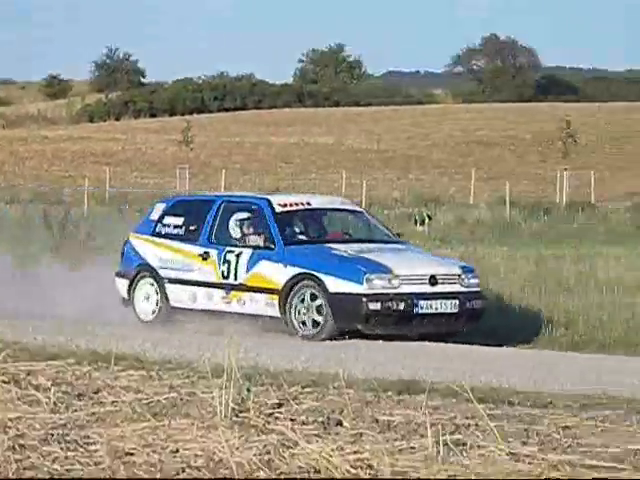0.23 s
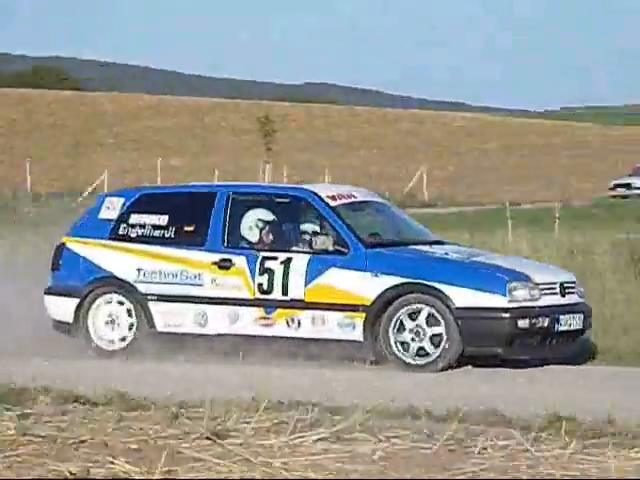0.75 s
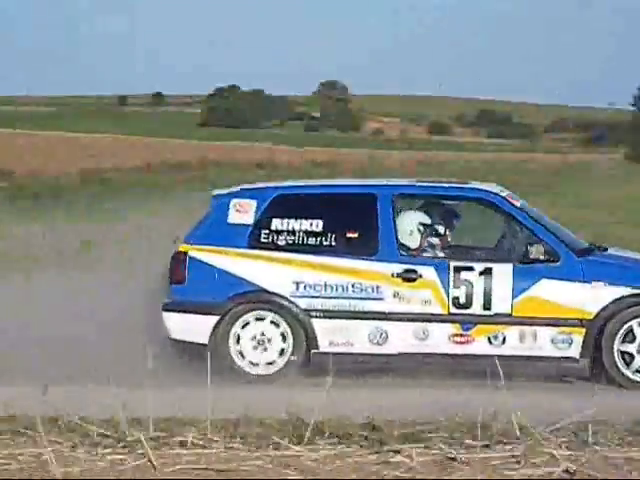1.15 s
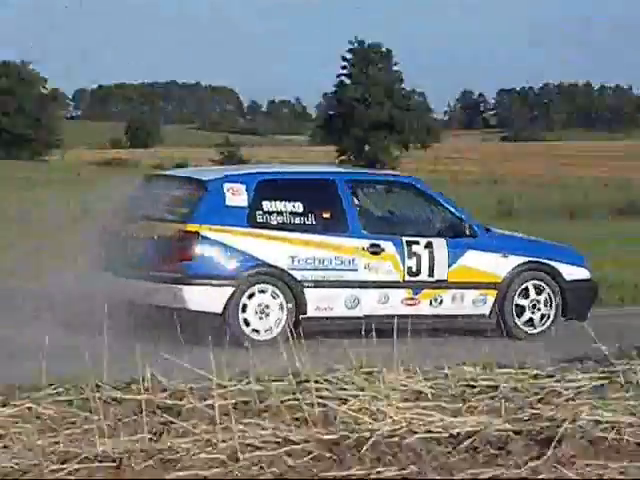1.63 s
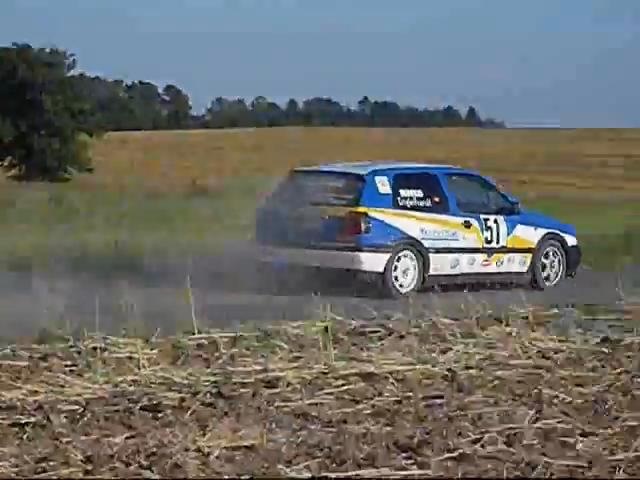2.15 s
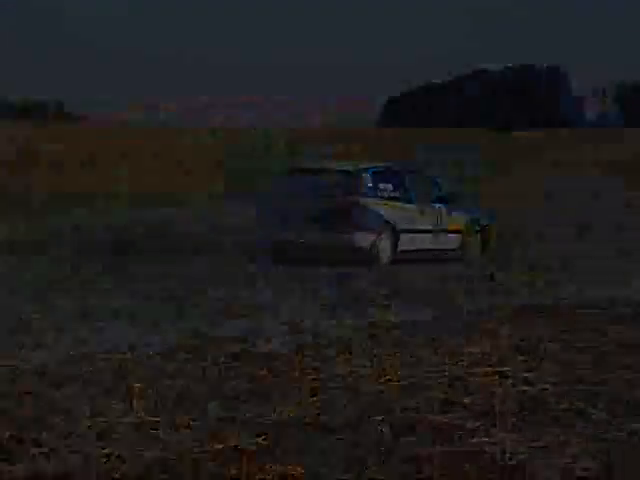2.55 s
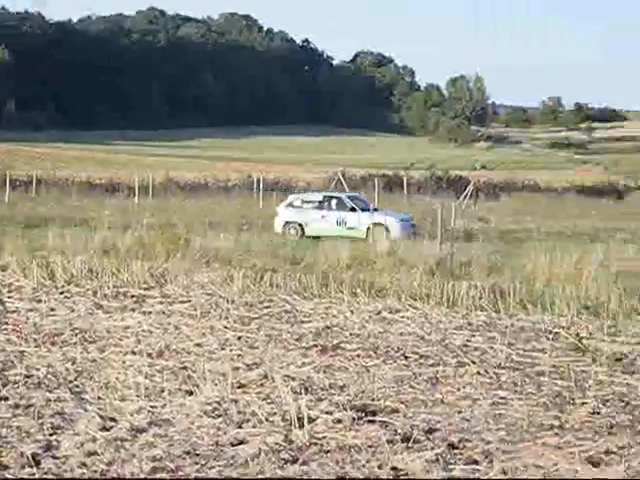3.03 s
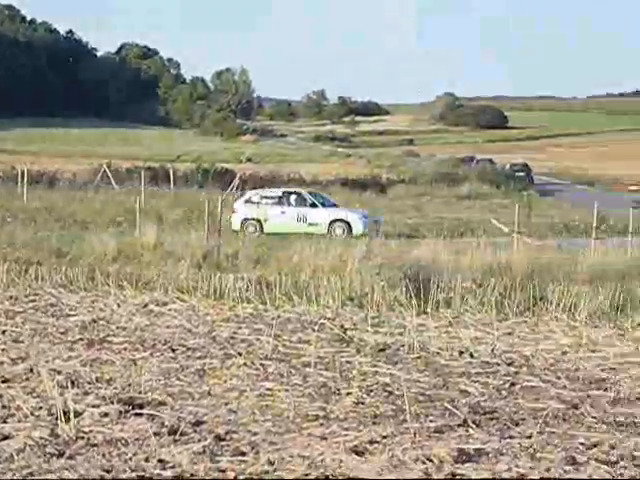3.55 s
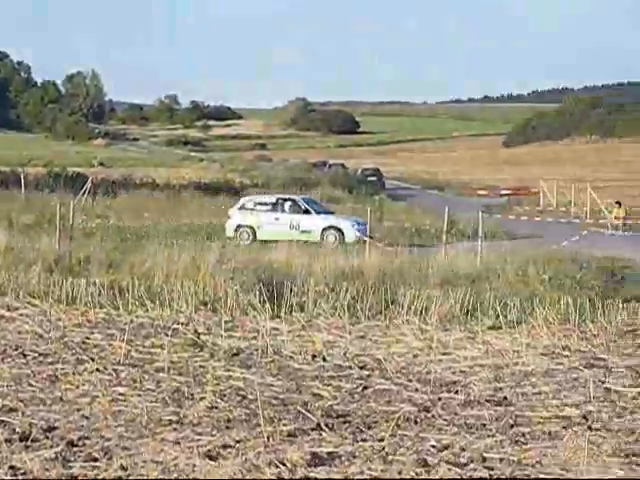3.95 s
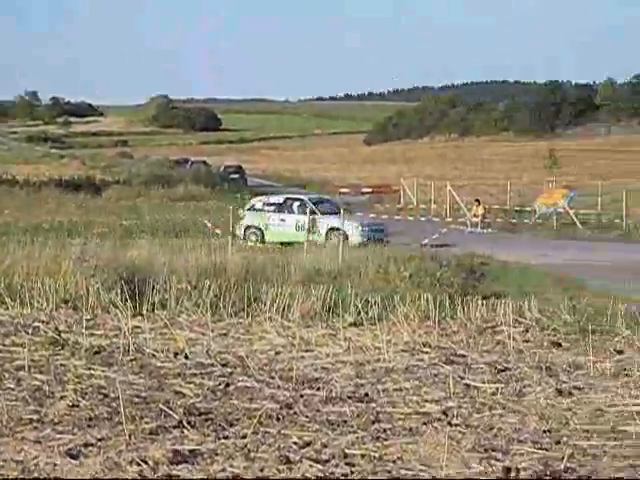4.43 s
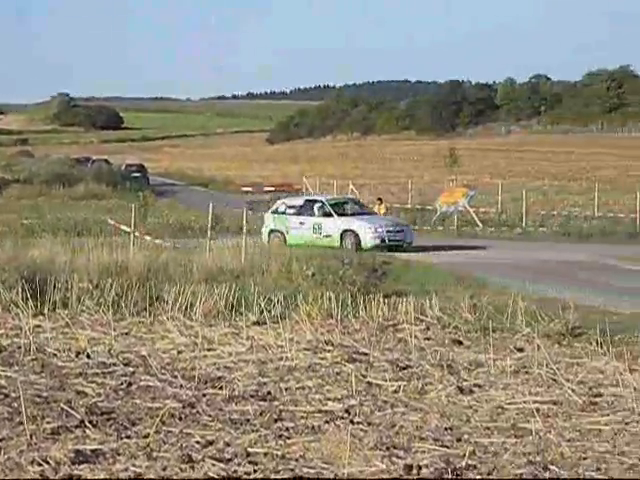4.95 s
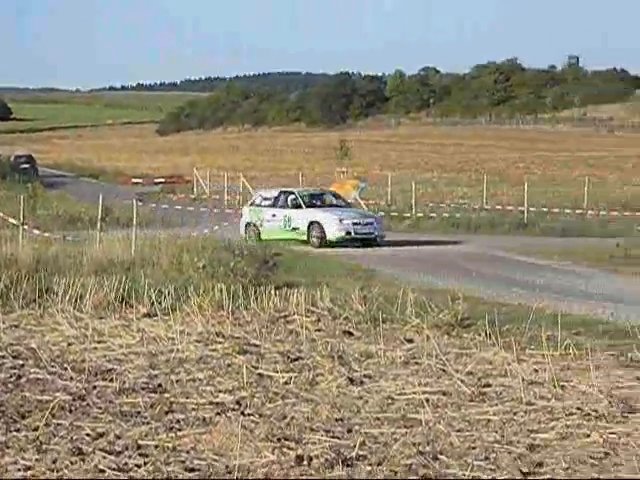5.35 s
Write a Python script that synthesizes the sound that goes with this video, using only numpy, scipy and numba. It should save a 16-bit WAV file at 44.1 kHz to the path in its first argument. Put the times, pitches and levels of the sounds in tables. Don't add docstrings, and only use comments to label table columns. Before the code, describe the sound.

Close pass first: full-throttle four-cylinder growl, heavy gravel spray, pebbles clicking and pinging against metal, brief gear whine, exhaust louder as it leaves. A hard edit drops to a far car across open fields, a faint hum over dull road roar that revs up and then brakes. Nearby fingers scrape and tick on the plastic camera, a tiny focus motor hisses, and two hard knocks jump out. The mono sound is coarse, hissy and low fidelity.

```python
import sys
import numpy as np
from scipy import signal
from scipy.fft import rfft, irfft, next_fast_len
from scipy.io import wavfile
from scipy.ndimage import uniform_filter1d
from numba import njit

SR = 44100
rng = np.random.default_rng(int(sys.argv[2]) if len(sys.argv) > 2 else 0)


def wav_out(sig):
    wavfile.write(sys.argv[1], SR, np.round(np.clip(np.atleast_2d(sig).T, -1, 1) * 32767).astype(np.int16))


def boost(x):
    u = np.asarray(x, float) / 20
    return 10 ** u


N = 246959

CUT_S = 2.879


def walk(rate):
    hold = int(SR / rate)
    levels = np.repeat(rng.standard_normal(N // hold + 1), hold)
    return 1.3 * uniform_filter1d(uniform_filter1d(levels, hold), hold)[:N]


def columns(rows):
    s, *cols = np.transpose(rows)
    return [np.interp(np.arange(N) / SR, s, col) for col in cols]


def surges(rows):
    t = np.arange(N) / SR
    return sum(db * np.exp(-((t - s) / width) ** 2) for s, db, width in rows)


def ease(at_s, db):
    return db * (1 + np.tanh((np.arange(N) / SR - at_s) / .06)) / 2


def colour(x, table):
    hz, db = np.transpose(table)
    size = next_fast_len(N)
    f = np.fft.rfftfreq(size, 1 / SR) + 1
    gain = boost(np.interp(np.log(f), np.log(hz), db, left=-60, right=-60))
    y = irfft(rfft(x, size) * gain, size)[:N]
    return y / np.sqrt(np.mean(y ** 2))


def grit(per_s, spread_db, share):
    share = np.clip(share, 0, 1)
    sizes = boost(spread_db * np.minimum(rng.exponential(size=N), 3))
    clicks = (rng.random(N) < per_s / SR) * sizes * rng.choice([-1, 1], N)
    return np.sqrt(1 - share) * rng.standard_normal(N) + np.sqrt(share) * clicks / np.std(clicks)


@njit
def rings(start, hz, t60, size):
    out = np.zeros(N)
    for k in range(len(start)):
        turn = np.exp(2j * np.pi * hz[k] / SR - np.log(1000) / (t60[k] * SR))
        z = size[k] + 0j
        for i in range(int(start[k] * SR), min(N, int((start[k] + t60[k]) * SR))):
            z *= turn
            out[i] += z.imag
    return out


def bursts(s, db, t60):
    # frequency in Hz, level in dB per Hz
    crack_tone = [(900, -30), (1500, -7), (2200, -1), (3000, 0.5), (3500, -1.5), (3900, -7.5), (4300, -18)]
    kicks = np.zeros(N)
    kicks[(s * SR).astype(int)] = boost(db)
    fades = signal.lfilter([1], [1, -boost(-60 / (t60 * SR))], kicks)
    return fades * colour(rng.standard_normal(N), crack_tone)


def strikes(rows, t60, low_hz, low_t60):
    s, db, hz, low_db = np.transpose(rows)
    one = np.ones(len(s))
    spot = 1.3 ** rng.uniform(-1, 1, len(s))
    crack = bursts(s, db - 11, 2.4 * t60)
    bright = rings(s, hz, t60 * one, boost(db - 3.5))
    dull = rings(s, low_hz * spot, low_t60 * one, boost(db + low_db - 8))
    return crack + bright + dull


def chips(rows, t60_at_1k, gain_db):
    s, hz, db = np.transpose(rows)
    t60 = t60_at_1k * np.minimum(1000 / hz, 1) ** .7
    return rings(s, 1. * hz, t60, boost(db + gain_db - 3 * (hz < 800)))


def order(phase, k, db, flutter_db):
    wobble = .09 * np.sqrt(k + 1) * walk(45)
    return np.sqrt(2) * boost(db + flutter_db * walk(25)) * np.sin(k * phase + wobble - k * k)


def whine(rows):
    hz, db = columns(rows)
    phase = 2 * np.pi * np.cumsum(hz * (1 + .012 * walk(40))) / SR
    return order(phase, 0.98, db, flutter_db=1.5)


def rattle():
    t = np.arange(N) / SR
    cycle = (t - 1.657) / .0284
    limp_db = 2.5 * np.cos(np.pi * np.floor(cycle))
    slap = boost(10.5 + limp_db) * np.exp(-(cycle % 1) / .35)
    return np.where(t < CUT_S, uniform_filter1d(slap, size=120), 1)


def far_car():
    # time in seconds, firing rate in Hz, level of the first order in dB
    far_engine = [
        (2.9, 99, -42.5),
        (3.15, 97, -44),
        (3.36, 109, -44),
        (3.55, 132, -44),
        (3.8, 155, -38.5),
        (4.3, 137.5, -42),
        (4.66, 116.9, -44.5),
        (5.05, 116, -45.5),
        (5.25, 115.8, -62),
    ]
    # multiple of the firing rate, level in dB against the first
    far_orders = [(1, 0.5), (2, -18.5), (3, -22)]
    # frequency in Hz, level in dB per Hz
    roar_tone = [(100, -23), (170, -6), (250, -5.5), (330, -10), (450, -8), (620, -12.5), (850, -14),
                 (1000, -20), (1400, -24), (1900, -44)]
    # time in seconds, surge in dB, width in seconds
    swells = [
        (3.05, 2.1, .06),
        (3.19, -2.5, .04),
        (3.9, 1.5, .08),
        (4.07, 2.5, .1),
        (4.38, 2.1, 0.056),
        (4.68, 2.5, .12),
        (5.12, -2.5, .15),
        (5.4, 2.5, .1),
    ]
    # time in seconds, change in dB, width in seconds
    misfires = [
        (3.515, -14, .018),
        (3.81, -9, .012),
        (4.445, -18, .016),
        (4.6, -7, .015),
    ]
    hz, db = columns(far_engine)
    phase = 2 * np.pi * np.cumsum(hz) / SR
    roar_db = -46 + surges(swells) + 1.5 + 1.1 * walk(30)
    roar = boost(roar_db) * colour(grit(500, 1.7, 0.18), roar_tone)
    db = db + surges(misfires)
    return sum(order(phase, k, db + rel_db, flutter_db=1.8) for k, rel_db in far_orders) + roar


def lens_motor():
    # time in seconds, surge in dB, width in seconds
    focus = [
        (2.96, 4, .08),
        (3.14, 5, .09),
        (3.49, 5, 0.057),
        (3.99, 3, 0.049),
        (4.36, 6, .04),
        (4.65, 4, .025),
        (4.73, 9, .04),
        (4.95, 4, .06),
        (5.3, 4, .06),
        (5.49, 4, .06),
    ]
    # frequency in Hz, level in dB per Hz
    motor_tone = [(1500, -29), (1700, -7), (1860, 0), (2000, -8.5), (2250, -31)]
    motor_db = -52 + ease(4.1, -5) + surges(focus) - 2 + .9 * walk(30) + .6 * walk(9)
    return boost(motor_db) * colour(rng.standard_normal(N), motor_tone)


def fingers():
    # time in seconds, surge in dB, width in seconds
    scrapes = [(3.08, 3, .04), (3.29, 2, .05), (3.74, 5.5, 0.076), (4.02, 4.5, 0.076), (4.245, 5, .035),
               (4.7, 3, .03), (4.31, 12, .025), (4.434, 11, .011), (4.57, 7, .045), (4.645, 10, .035),
               (4.77, 9, .045), (4.96, 3, .04), (5.31, 9.5, 0.057), (5.52, 5.5, .06)]
    # frequency in Hz, level in dB per Hz
    rustle_tone = [(650, -58), (1100, -14.5), (1250, -9), (1380, -10.5), (1490, -5), (1610, -5.5),
                   (1860, -0.5), (2000, -3.5), (2210, -0.5), (2450, -7.5), (3090, 1), (3500, -6),
                   (4000, -9), (5200, -47), (8800, -120)]
    rumble_tone = [(35, -6), (70, 0), (110, -1), (150, -12)]
    # time in seconds, peak in dB, ring in Hz, dull part in dB
    ticks = [(3.0086, -38, 2960, -5), (3.0643, -33, 3000, -10), (3.4426, -43, 2117, -10),
             (3.71, -38, 2230, -5), (3.8721, -36, 3000, -7), (3.928, -21.5, 2190, -19),
             (3.9853, -33, 2350, -3), (4.0292, -37, 2930, -1), (4.0532, -36, 1900, -20),
             (4.146, -38, 3150, -3), (4.4215, -32, 2940, 1), (4.4528, -25.5, 3160, -1),
             (4.583, -25, 3150, -4), (4.5835, -29, 1950, -9), (4.8714, -40, 3172, -10),
             (4.9655, -33, 3155, -6), (5.5934, -26, 3140, -14)]
    # time in seconds, pitch in Hz, peak in dB
    taps = [(3.008, 2993, -40), (3.022, 1873, -37), (3.044, 1851, -37), (3.054, 452, -32),
            (3.062, 2950, -33), (3.063, 2174, -34), (3.281, 452, -37), (3.581, 452, -34), (3.725, 452, -34),
            (3.746, 3036, -37), (3.756, 452, -35), (3.872, 2993, -39), (4.308, 452, -33),
            (4.429, 2928, -35), (4.453, 2260, -37), (4.456, 1787, -38), (4.584, 452, -31),
            (4.643, 2820, -37), (4.703, 452, -32), (4.745, 1851, -37), (4.787, 452, -35),
            (4.964, 3186, -42), (5.287, 2950, -41), (5.313, 452, -34), (5.365, 473, -35),
            (5.492, 1744, -34), (5.493, 2993, -37), (5.493, 2282, -34), (5.591, 3122, -40)]
    rustle_db = -52.5 + ease(4.85, -6) + surges(scrapes) + 3.0 + 1.2 * walk(60) + .6 * walk(12)
    rustle = boost(rustle_db) * colour(grit(1500, 1.6, .3), rustle_tone)
    rumble_db = -65 + ease(4.2, 7) + 2.5 * walk(8)
    rumble = boost(rumble_db) * colour(rng.standard_normal(N), rumble_tone)
    return rustle + rumble + strikes(ticks, .012, 520, .025) + chips(taps, .03, -2)


def knocks():
    # time in seconds, peak in dB
    ratchet_clicks = [
        (4.0585, -42),
        (4.0695, -42),
        (4.0825, -37),
        (4.0885, -40),
        (4.0918, -37),
        (4.0952, -34),
        (4.0985, -38),
        (4.1055, -36),
        (4.108, -32),
    ]
    # time in seconds, peak in dB, ring in Hz, t60 in seconds, crackle in dB
    snap_rows = [(4.1015, -21, 3700, .0045, -38), (4.1103, -20, 2300, 0.0055, -27),
                 (4.11043, -19, 3900, .008, -34), (4.110675, -14, 3850, 0.005, -30),
                 (4.111175, -7, 3750, 0.0035, -30), (4.1135, -18, 1790, .016, -31),
                 (4.117, -24, 3200, .02, -30), (4.1122, -13.5, 2200, 0.016, -30),
                 (4.1108, -20, 560, .02, -40), (4.1155, -17, 1400, .006, -40),
                 (4.1133, -17, 2250, .008, -34), (4.2784, -6.5, 3400, 0.0065, -22),
                 (4.2783, -11.5, 2900, 0.02, -22), (4.2797, -18, 2600, .01, -28),
                 (4.27864, -16, 3850, .005, -30), (4.2786, -14, 2150, .007, -34),
                 (4.2795, -20, 800, .012, -40), (4.2845, -26, 2900, .03, -34),
                 (4.2823, -22, 2670, 0.018, -40), (5.4942, -28, 2200, 0.012, -36),
                 (5.4948, -33, 3000, 0.008, -44), (5.495, -30, 1750, .012, -44),
                 (2.8, -27.5, 1900, 0.012, -39), (4.0533, -28, 3270, 0.011, -38),
                 (3.055, -37, 2980, .014, -44), (3.0628, -34, 2980, .03, -50),
                 (3.0648, -29, 2980, .014, -48), (3.0652, -31, 2200, .012, -48),
                 (3.0648, -32, 1850, .014, -50), (4.3045, -29, 2900, .03, -32)]
    # time in seconds, peak in dB, push direction, sharpness in dB per octave
    thump_rows = [
        (4.1153, -2.5, 1, -1),
        (4.2791, -5, -0.97, -9.5),
        (5.4903, -25, -1, -9),
        (5.4936, -23.5, 1, 0),
        (5.4975, -29, 0.97, -8),
    ]
    # frequency in Hz, level in dB, t60 in seconds
    shell_modes = [(202, -19.5, 0.13), (285, -19, .04), (458, -4.5, 0.019), (610, 1.5, 0.0089),
                   (1000, -8.5, .008), (1440, -29, 0.0082), (1814, -21, 0.014)]
    s, db, hz, t60, crackle_db = np.transpose(snap_rows)
    snaps = rings(s, hz, t60, boost(db)) + bursts(s, crackle_db, 0.018)
    s, db = np.transpose(ratchet_clicks)
    ratchet = rings(s, 3800 + 0 * s, .005 + 0 * s, boost(db))
    s, db, way, sharp_db = np.transpose(thump_rows)
    thumps = np.zeros(N)
    for hz, mode_db, t60 in shell_modes:
        peak_db = db + mode_db + sharp_db * max(np.log2(hz / 436), 0)
        thumps += rings(s, hz + 0 * s, t60 + 0 * s, way * boost(peak_db))
    thumps = signal.sosfilt(signal.butter(2, 152, "high", fs=SR, output="sos"), thumps)
    return snaps + thumps + ratchet


def gravel(phase):
    # time in seconds, level in dB
    gravel_level = [
        (0, -23),
        (.25, -24),
        (.6, -22.5),
        (.95, -26),
        (1.2, -29),
        (1.5, -30),
        (1.85, -35),
        (2.2, -37.5),
        (2.87, -37),
    ]
    # time in seconds, surge in dB, width in seconds
    ruts = [(.18, 2, 0.064), (.33, -1, 0.06), (.6, 1.6, .05), (.69, 2, 0.022), (.79, 1.5, .04),
            (.9, 1.5, .04), (1.04, 2.2, .05), (1.27, 2, .05), (1.42, 2.5, .06), (1.6, 2, 0.035),
            (1.72, 1, 0.033), (1.89, 2, .04), (2.23, 1.5, 0.029), (2.5, 1.5, 0.042), (2.7, 2, .06)]
    # frequency in Hz, level in dB per Hz
    drum_tone = [(40, -45), (90, -12.5), (200, 2), (350, -5.5), (600, 0.5), (800, -15), (1100, -32.5)]
    crunch_tone = [(500, -9), (700, -8.5), (990, 1), (1280, -1.5), (1600, -0.5), (1800, -8.5),
                   (2300, -24.5)]
    spray_tone = [(1300, -19), (1800, -4.5), (2400, -0.5), (3130, 1.5), (3500, 2.5), (3950, 2.5),
                  (4400, -48.5)]
    # time in seconds, peak in dB, ring in Hz, dull part in dB
    sill_stones = [(0.504, -13, 1430, -27), (0.675, -10.5, 964, 4.5), (0.8455, -7, 3300, -18),
                   (0.87, -10, 3700, -18), (0.961, -21, 1010, -17), (0.997, -7, 3440, -21),
                   (1.13, -11, 3840, -19), (1.151, -19, 3210, -19), (1.243, -9, 1020, -15),
                   (1.497, -14, 3211, -15), (1.649, -17, 899, -12), (1.723, -11, 3580, -13),
                   (1.771, -17, 1300, -18), (1.882, -10.5, 1040, -16), (2.025, -15.5, 1240, -5),
                   (2.222, -14, 2900, -14), (2.39, -14.5, 2620, -18), (2.442, -23, 1730, -5),
                   (2.595, -18, 3330, -5), (2.854, -17, 801.6, -9)]
    # time in seconds, pitch in Hz, peak in dB
    panel_pings = [(.085, 1150, -16), (.29, 1560, -16), (.351, 915, -13.5), (.366, 1646, -13),
                   (.449, 1093, -13), (.452, 620, -16), (.548, 950, -14), (.562, 784, -12),
                   (.578, 1000, -15), (.59, 620, -14.5), (.638, 1140, -13), (.671, 697, -10.5),
                   (.679, 963, -14), (.752, 540, -16.5), (.783, 3180, -12.5), (.905, 3250, -15),
                   (.961, 1040, -13.5), (.964, 556, -20), (1.018, 1620, -16), (1.055, 1550, -15),
                   (1.255, 1010, -15), (1.44, 2270, -17.5), (1.495, 3250, -18), (1.806, 3800, -20),
                   (2.215, 1223, -20.5), (2.22, 3970, -24)]
    # time in seconds, pitch in Hz, peak in dB
    stone_chips = [(0.046, 2713, -19), (0.088, 1162, -16), (0.103, 2971, -17), (0.122, 2993, -18),
                   (0.153, 1076, -17), (0.191, 3186, -18), (0.217, 3574, -19), (0.259, 3122, -18),
                   (0.373, 1378, -15), (0.419, 1421, -15), (0.455, 3552, -20), (0.504, 1464, -14),
                   (0.551, 990, -12), (0.606, 947, -14), (0.649, 1119, -13), (0.689, 1722, -17),
                   (0.701, 3229, -18), (0.702, 3940, -17), (0.79, 3789, -19), (0.842, 3294, -19),
                   (0.86, 1227, -18), (0.868, 3789, -17), (0.907, 3273, -16), (0.937, 947, -18),
                   (0.965, 1593, -16), (1.063, 1507, -16), (1.07, 3122, -20), (1.091, 1528, -19),
                   (1.132, 3811, -21), (1.152, 3208, -19), (1.243, 3703, -19), (1.244, 2411, -20),
                   (1.257, 645, -19), (1.321, 473, -18), (1.419, 645, -18), (1.431, 2583, -22),
                   (1.435, 3122, -19), (1.522, 3273, -22), (1.713, 1291, -20), (1.723, 3574, -19),
                   (1.793, 2691, -22), (1.8812, 1130, -17), (1.882, 900, -17), (1.916, 1248, -22),
                   (2.025, 3789, -24), (2.442, 1701, -24), (2.542, 1658, -24), (2.672, 1571, -24),
                   (2.7, 689, -17), (2.734, 3552, -25), (2.738, 2519, -25), (2.777, 689, -17),
                   (2.777, 3186, -26), (2.847, 3208, -26), (2.853, 1227, -27), (2.853, 2174, -27),
                   (2.854, 1593, -25)]
    crunch_db = columns(gravel_level)[0] + surges(ruts)
    spray_db = -28 + 0.54 * (crunch_db + 30) + .3 * surges(ruts)
    drum_db = -35.5 + 0.68 * (crunch_db + 30)
    bumps = walk(40.06)
    puff = 1 + 0.042 * np.cos(phase + 2.0)
    drum = boost(drum_db + 0.55 * bumps + 0.91 * walk(19)) * colour(grit(500, 2.7, 0.12), drum_tone)
    crackle = grit(1900, 2.4, .45)
    crunch = boost(crunch_db - 1.6 + 0.8 * bumps + 0.68 * walk(35)) * colour(crackle, crunch_tone)
    spray = boost(spray_db + 2.0 + 0.5 * bumps + .9 * walk(90)) * colour(crackle, spray_tone)
    when, pitch, length, force = rng.random((400, 4)).T
    s = CUT_S * when
    pebble_db = crunch_db[(s * SR).astype(int)] - 8.5 + 6.0 * force
    pebbles = rings(s, 500 * 3.5 ** pitch, 0.049 + .06 * length, boost(pebble_db))
    s, hz, db = np.transpose(panel_pings)
    pings = rings(s, hz, 0.069 + 0 * s, boost(db - 2.5))
    stones = chips(stone_chips, .045, -2.5) + strikes(sill_stones, 0.0093, 868, 0.068)
    return drum + puff * (crunch + spray) + pebbles + pings + stones


def echo_db(k):
    # multiple of the firing rate, time in seconds, change in dB, width in seconds
    ground_echo = [(2, .08, 3, .1), (2, .95, -4, .05), (2, 1.25, -5, .04), (2, 2.03, 2, .08),
                   (2, 2.77, 4, .08), (3, .08, 5, .1), (3, 1.45, 3, .1), (3, 1.73, -2, .1),
                   (3, 1.95, 2, .06), (3, 2.25, -3, .06), (3, 2.72, -4, .12), (4, 1.3, -5, .06),
                   (4, 1.74, -2.5, .13), (4, 1.45, 4, .04), (4, 1.56, -5, .04), (4, 1.83, -6, .04),
                   (4, 2.05, 2, .05), (4, 2.25, -4, .04), (5, 1.15, -4, .08), (5, 2.22, -3, .1),
                   (5, 2.44, -4, .05), (5, 2.7, 3, .12), (6, 1.65, 5, .05), (6, 2.0, 6, .07),
                   (6, 2.65, -3, .1)]
    return surges([row for multiple, *row in ground_echo if multiple == k])


def near_engine():
    # time in seconds, firing rate in Hz, level in dB, side facing us (0 nose to 3 tail)
    near_car = [(0, 124.5, -32, 0), (.15, 129, -31, .07), (.33, 134.8, -28.5, 0.2), (.55, 142.5, -29, .8),
                (.67, 147.8, -29.5, 1.2), (.85, 144, -29.5, 1.26), (.98, 141, -28.5, 1.24),
                (1.1, 142.5, -27.5, 1.2), (1.24, 145, -26, 1.16), (1.33, 143.8, -26.5, 1.97),
                (1.56, 142.3, -26, 2), (1.66, 143.8, -25, 2.04), (1.78, 143, -26, 2.07),
                (1.9, 144.8, -24, 2.1), (2.2, 148.8, -23, 2.4), (2.49, 152.8, -22, 2.7),
                (2.68, 156, -22, 3), (2.87, 158, -21, 4)]
    # multiple of the firing rate, level in dB at nose, flank, rear quarter and tail
    radiation = [
        (2, 0.4, -11, -5, -12.5),
        (3, -16, -19, -10, -19),
        (4, -17, -19, -9, -9.5),
    ]
    # multiple, level in dB
    tailpipe = [(4, 1.5), (5, -1), (6, -10), (7, -19), (8, -13.5), (9, -20), (10, -15.5), (11, -15.5),
                (1.5, -16), (4.5, -16)]
    # time in seconds, dB, width in seconds
    load = [
        (.35, 3, .06),
        (.54, -5, .03),
        (.76, -4, .04),
        (.94, -4, .03),
        (1.02, 2.5, .05),
        (1.22, 2.5, .04),
        (1.29, -4, .02),
        (1.62, 2.5, .04),
    ]
    # time in seconds, dB, width in seconds
    intake = [
        (.44, 3, .08),
        (.685, 9, .025),
        (1.1, 6, .06),
        (1.62, 2.5, .06),
        (2.45, -3, .15),
    ]
    hz, first_db, aspect = columns(near_car)
    phase = 2 * np.pi * np.cumsum(hz * (1 + 0.0015 * walk(40))) / SR
    second_db, third_db, fourth_db = (first_db + np.interp(aspect, np.arange(len(db)), db) for _, *db in radiation)
    first = order(phase, 1, first_db + surges(load), flutter_db=0.7)
    second_db = second_db + .6 * surges(load) + surges(intake) + echo_db(k=2)
    second = order(phase, 2, second_db, flutter_db=1.2)
    third = order(phase, 3, third_db + .4 + echo_db(k=3), flutter_db=1.3)
    pipe = sum(order(phase, k, fourth_db + echo_db(round(k, 1)) + db, flutter_db=1.4) for k, db in tailpipe)
    return first + second + third + pipe, phase


def scene():
    # time in seconds, pitch in Hz, level in dB
    gear_whine = [
        (1.45, 1337, -52),
        (1.6, 1345, -38),
        (1.9, 1300, -39.5),
        (2.2, 1275, -48),
        (2.35, 1247, -77.5),
        (3.42, 1014, -77),
        (3.5, 995, -56),
        (3.65, 950, -56),
        (3.72, 943, -73),
    ]
    # time in seconds, pitch in Hz, level in dB
    strap_creak = [
        (5.33, 280, -80),
        (5.36, 265, -45),
        (5.42, 180, -44),
        (5.45, 160, -80),
    ]
    engine, phase = near_engine()
    first = np.clip((CUT_S - np.arange(N) / SR) * 1000, 0, 1)
    screen = boost(surges([(1.54, -5, 0.019)]))
    near = screen * (engine + gravel(phase))
    far = far_car() + lens_motor() + fingers() + knocks()
    mono = first * near + (1 - first) * far + rattle() * whine(gear_whine) + whine(strap_creak)
    return np.array([mono, mono])


def top_cut(x):
    return signal.sosfilt(signal.butter(12, 16720, fs=SR, output="sos"), x)


def record(dry):
    hold_hz, hold_phase, steps = 8001.46, .3, 128
    hiss_tone = [(20, -9), (60, -2), (100, 1), (150, 0), (900, -4), (4000, -9.0)]  # (Hz, dB per Hz)
    hiss = boost(-54) * colour(rng.standard_normal(N), hiss_tone)
    mic = signal.sosfilt(signal.butter(2, 96, "high", fs=SR, output="sos"), dry) + hiss
    tick = np.floor(np.arange(N) * hold_hz / SR + hold_phase)
    taken = np.clip(((tick - hold_phase) * SR / hold_hz).astype(int), 0, N - 1)
    held = np.floor(np.clip(mic[:, taken], -1, 1) * steps) / steps
    held = signal.sosfiltfilt(signal.ellip(10, .1, 75, 15650, fs=SR, output="sos"), held)
    return top_cut(held)


dry = scene()
out = record(dry)
wav_out(out)
```